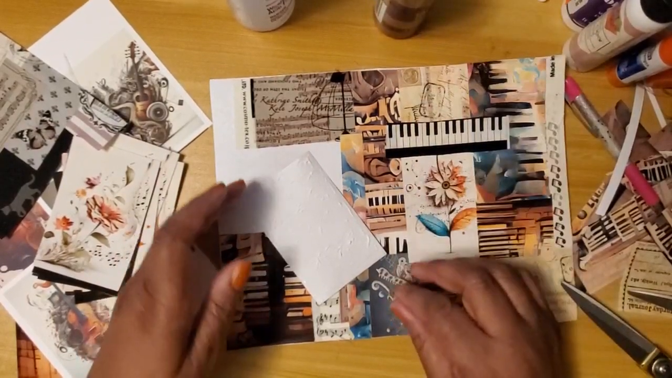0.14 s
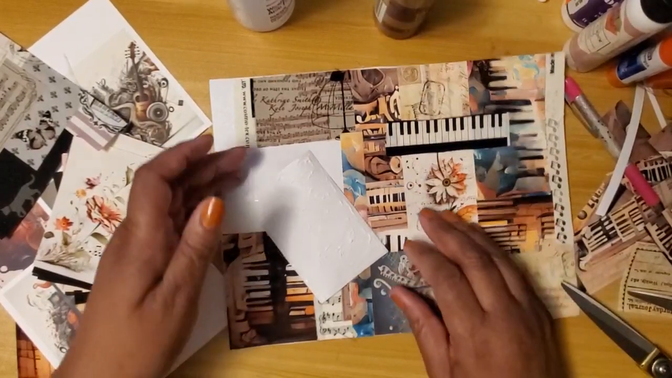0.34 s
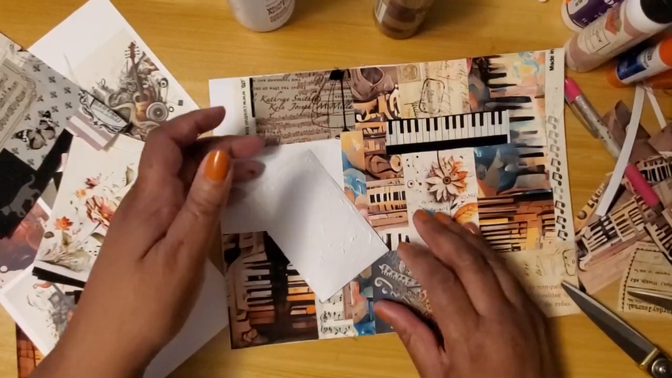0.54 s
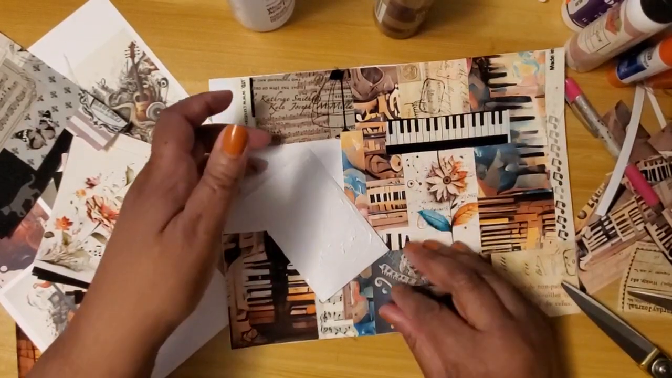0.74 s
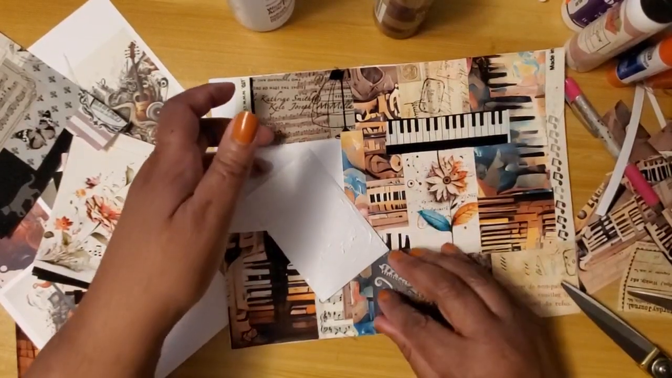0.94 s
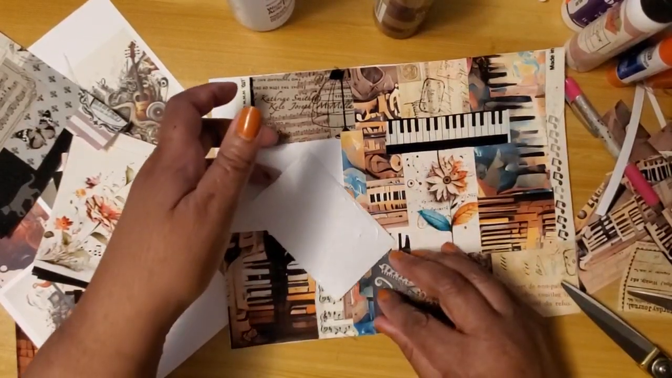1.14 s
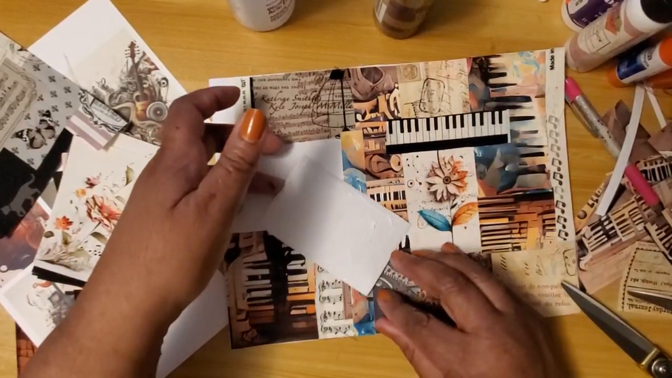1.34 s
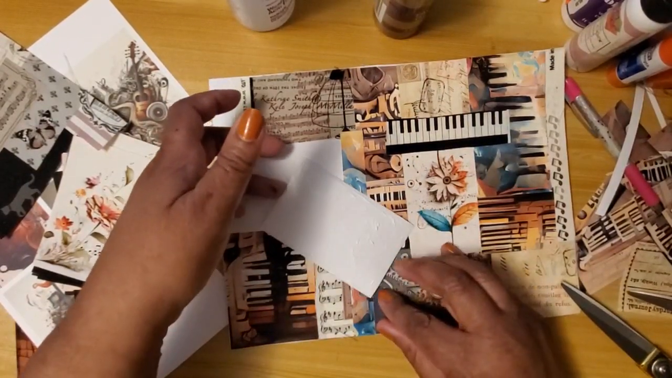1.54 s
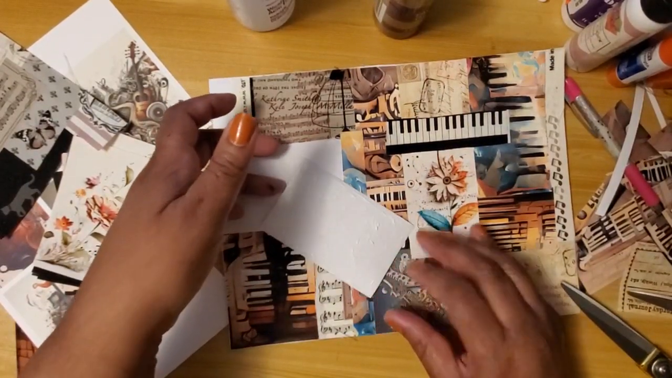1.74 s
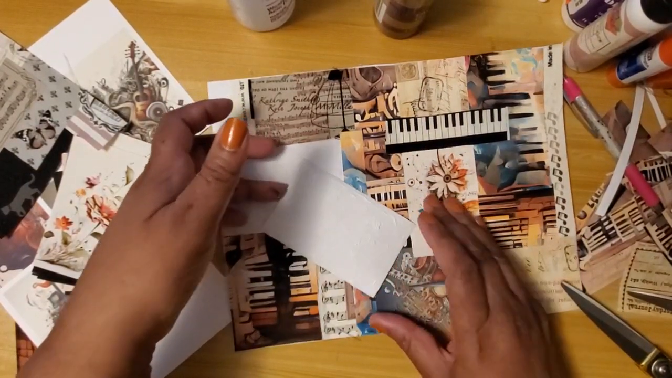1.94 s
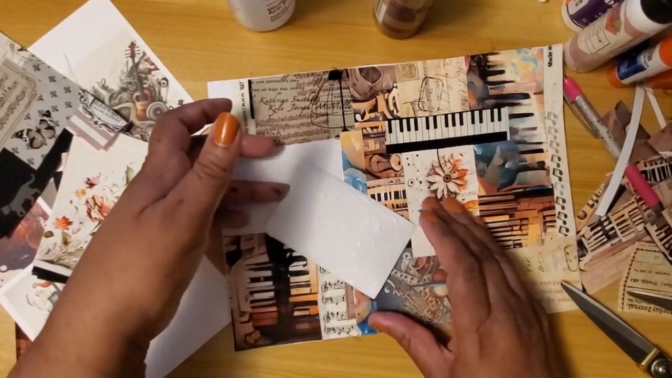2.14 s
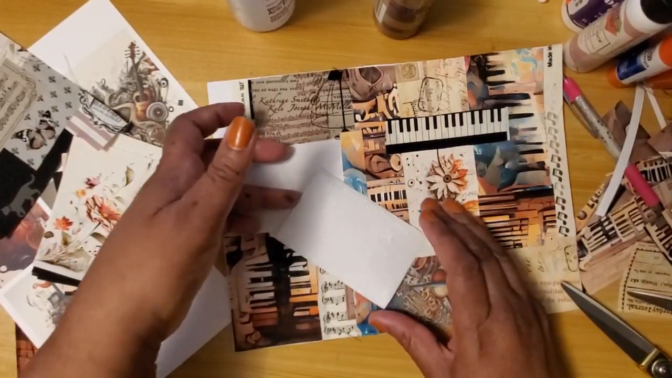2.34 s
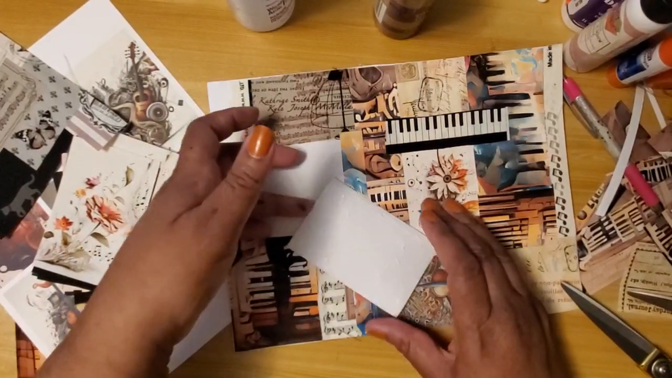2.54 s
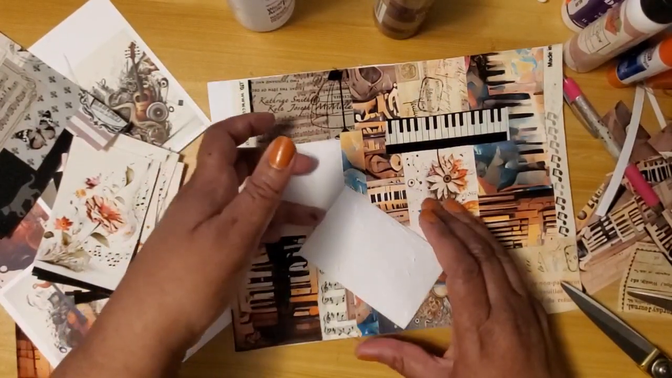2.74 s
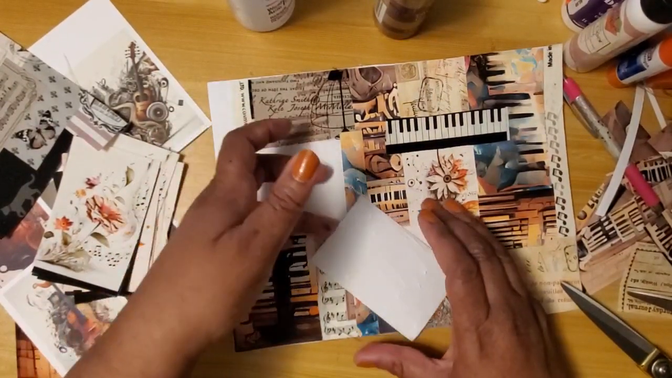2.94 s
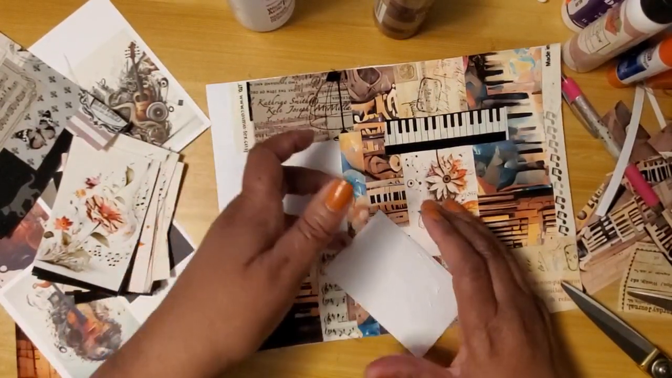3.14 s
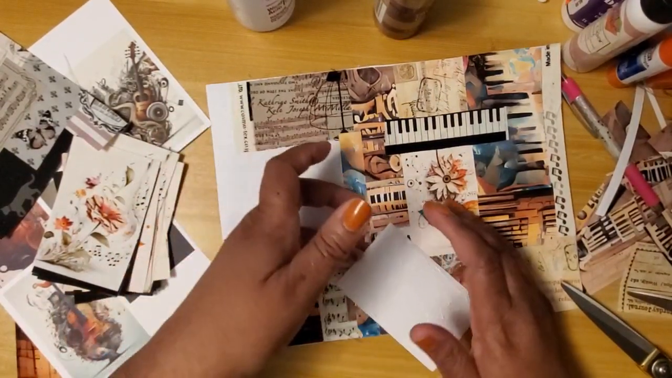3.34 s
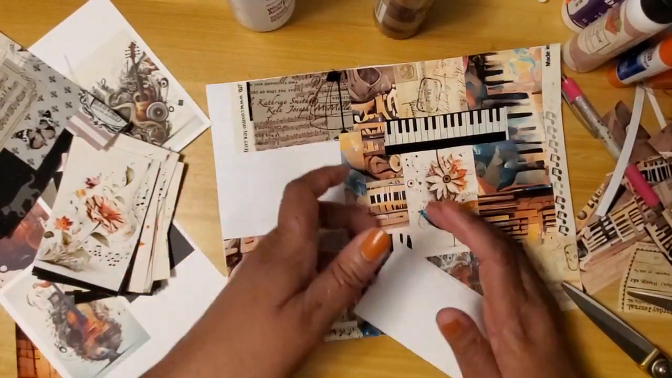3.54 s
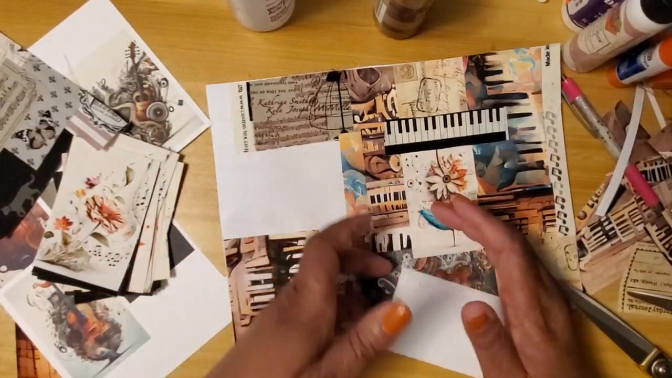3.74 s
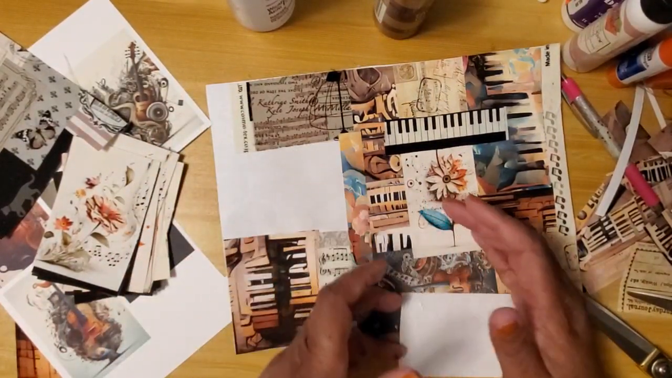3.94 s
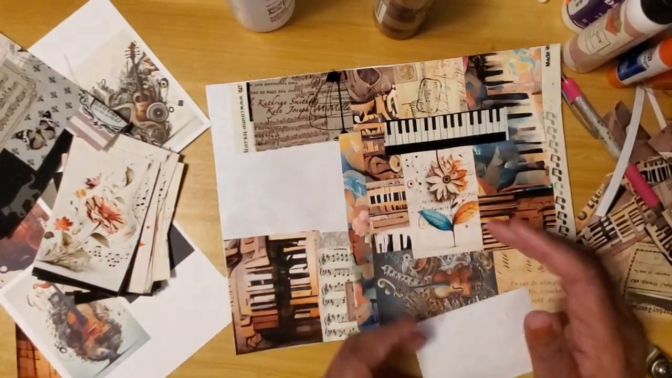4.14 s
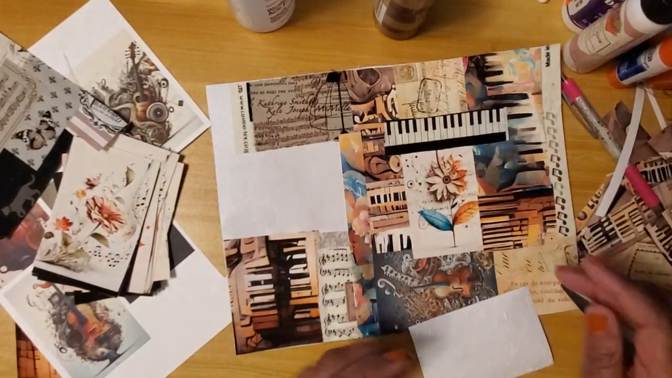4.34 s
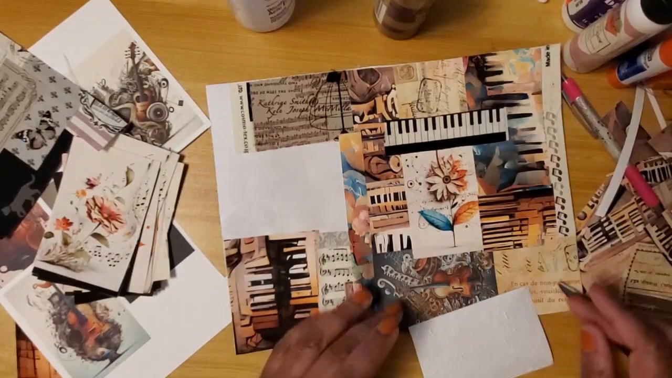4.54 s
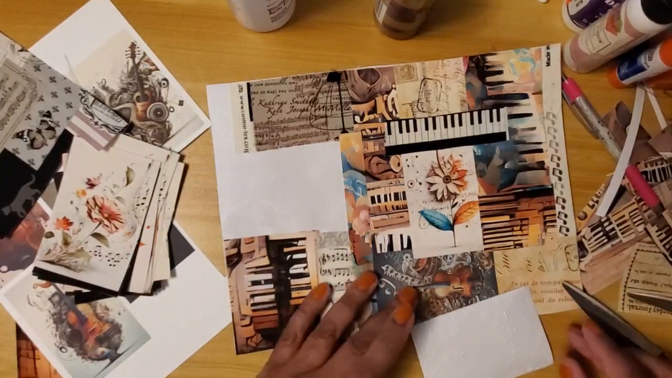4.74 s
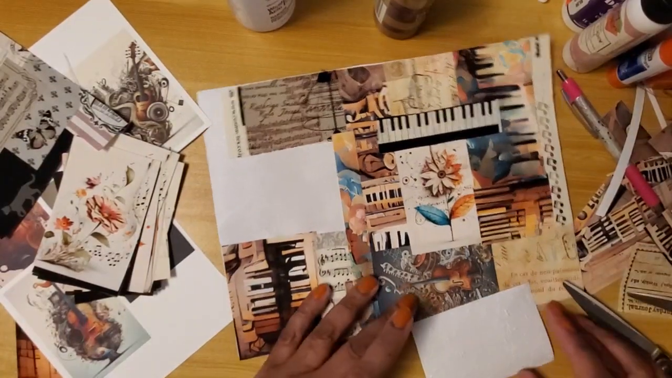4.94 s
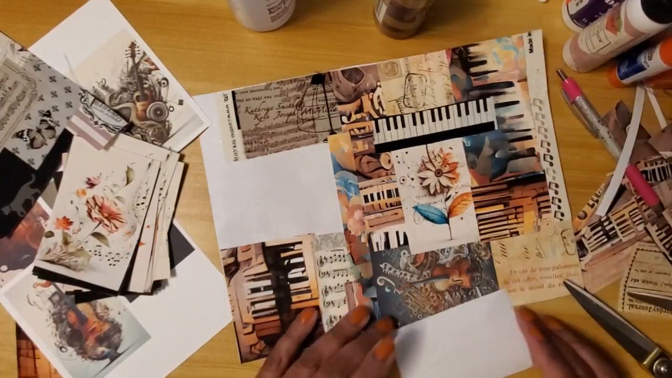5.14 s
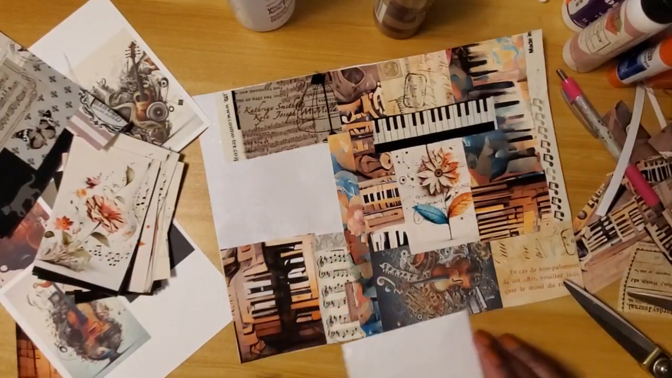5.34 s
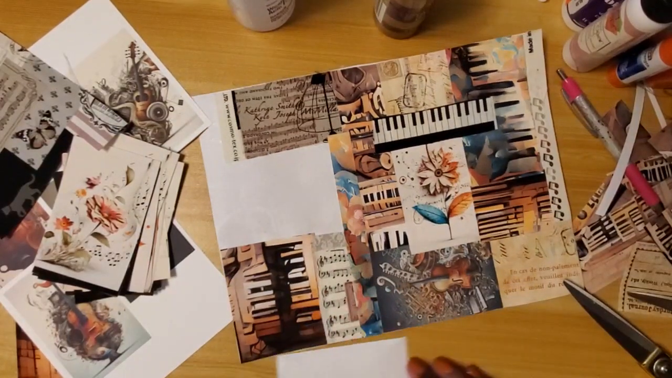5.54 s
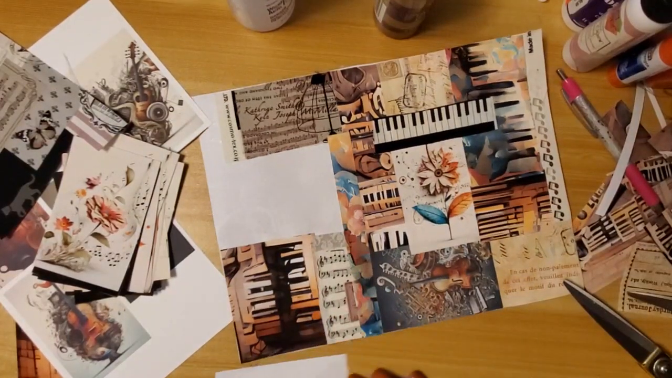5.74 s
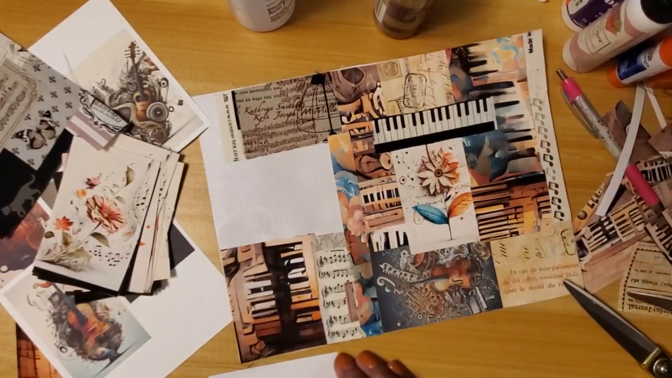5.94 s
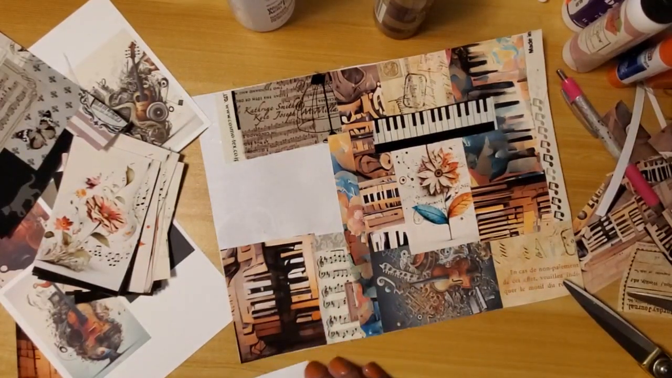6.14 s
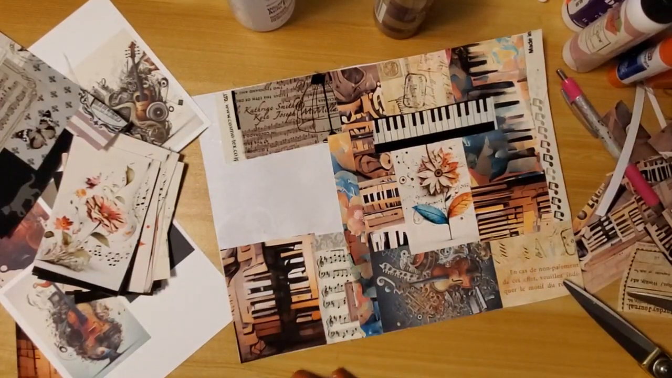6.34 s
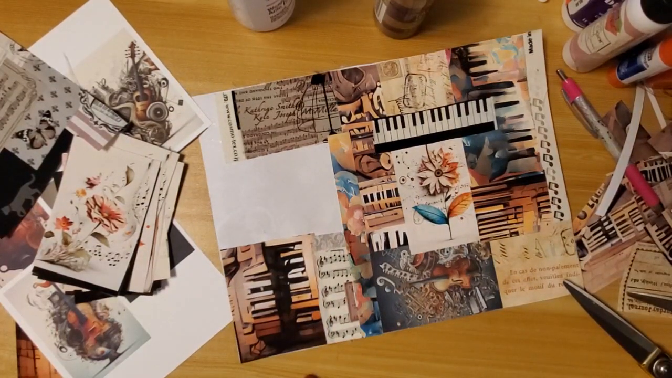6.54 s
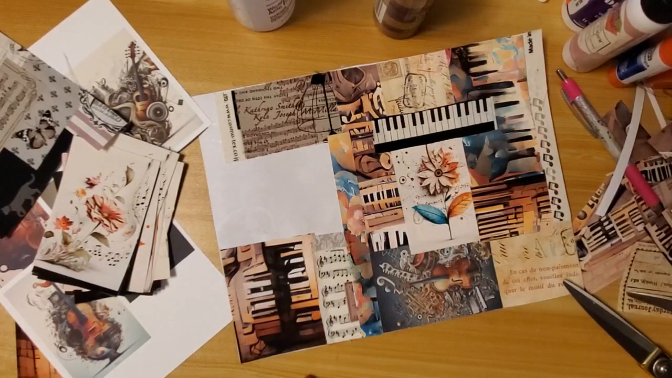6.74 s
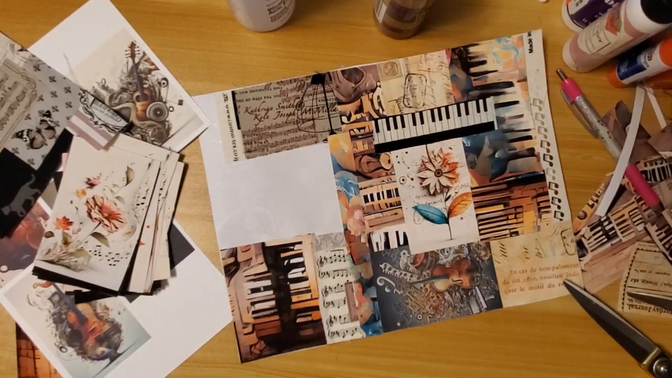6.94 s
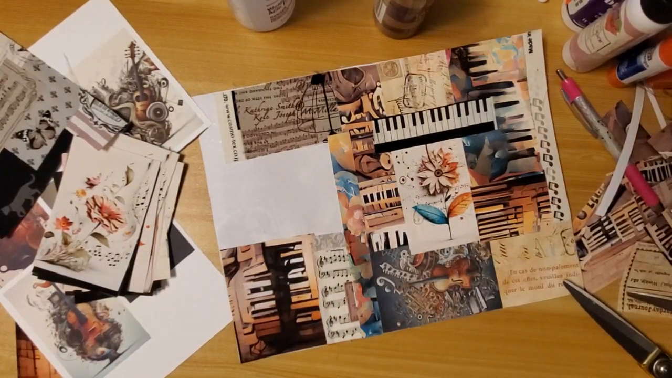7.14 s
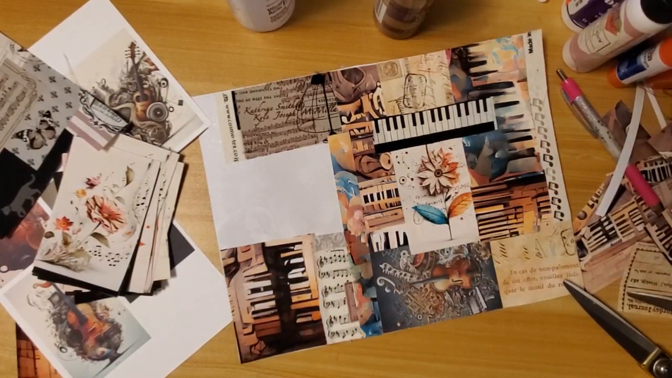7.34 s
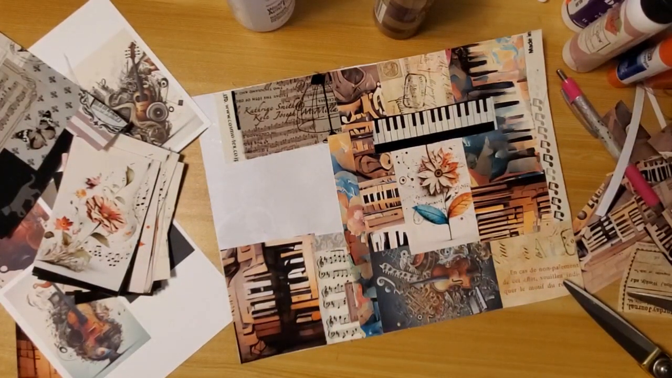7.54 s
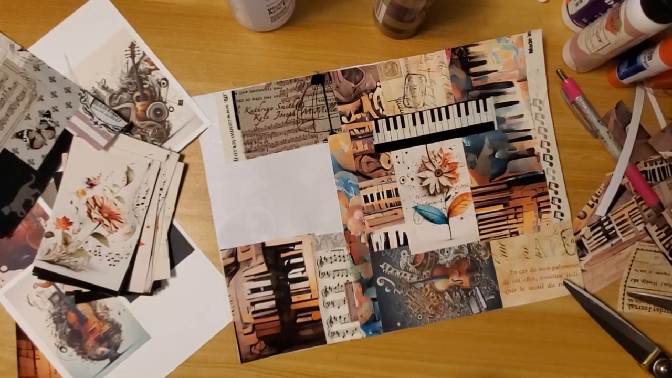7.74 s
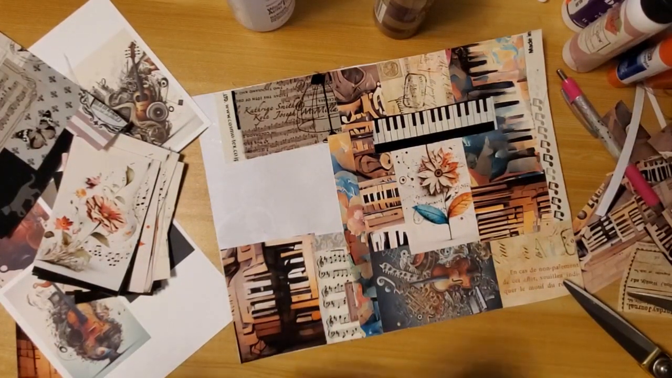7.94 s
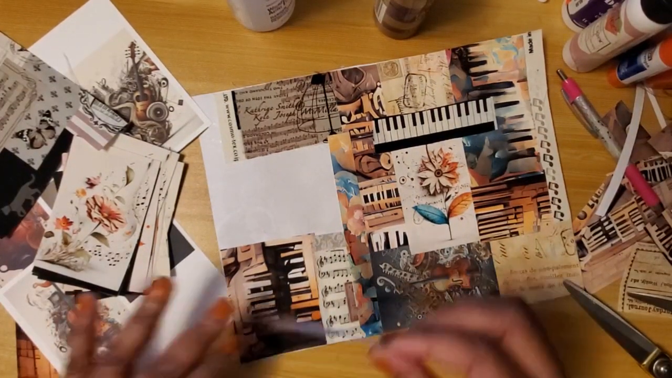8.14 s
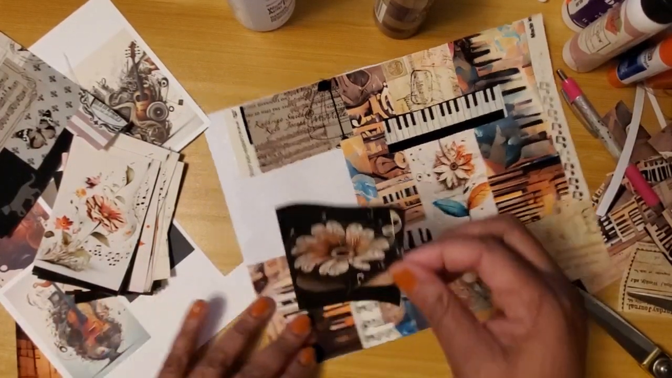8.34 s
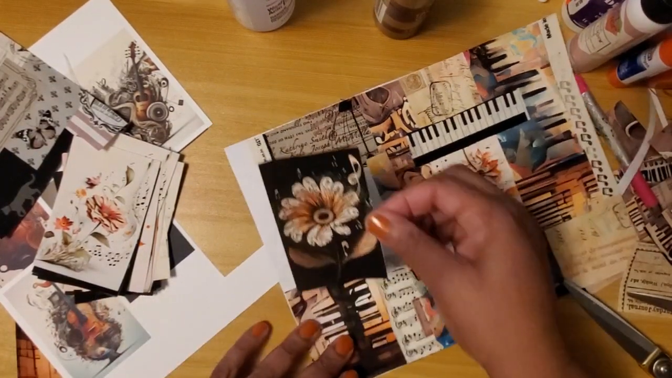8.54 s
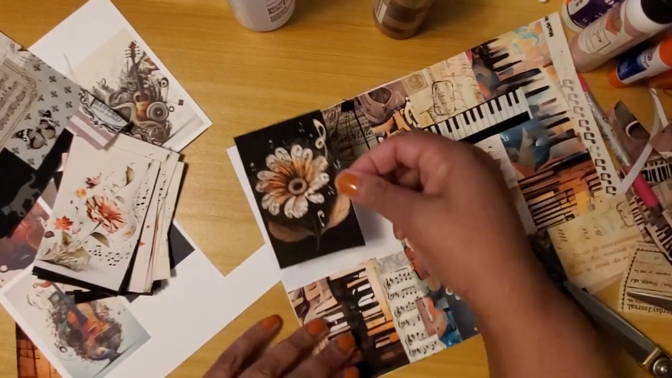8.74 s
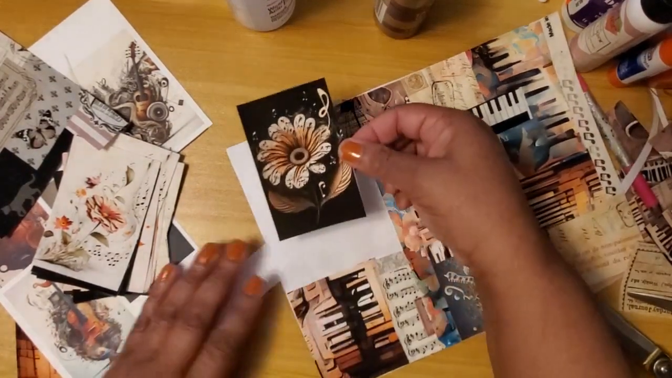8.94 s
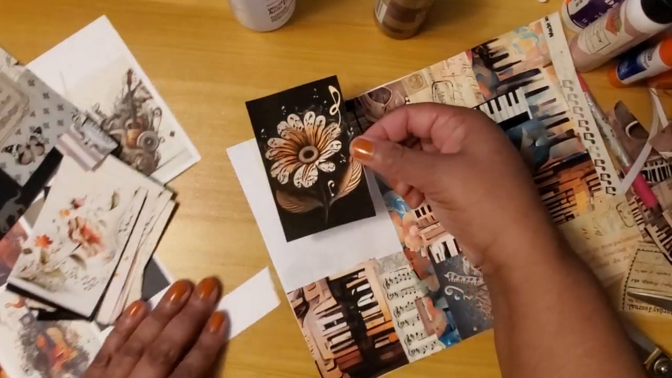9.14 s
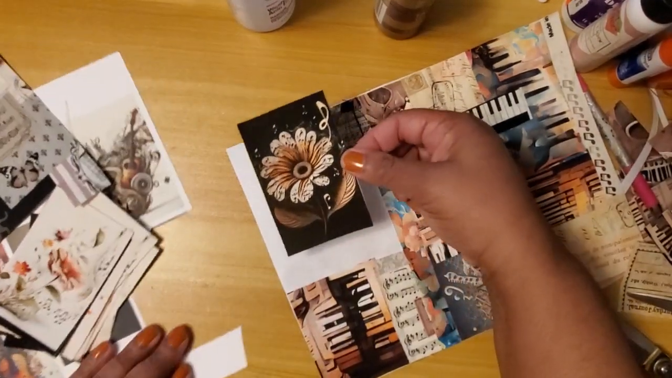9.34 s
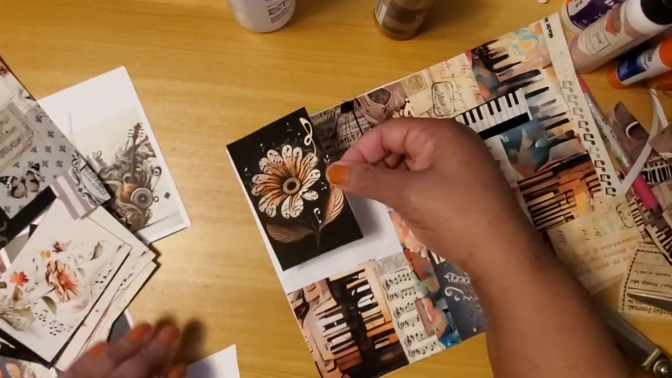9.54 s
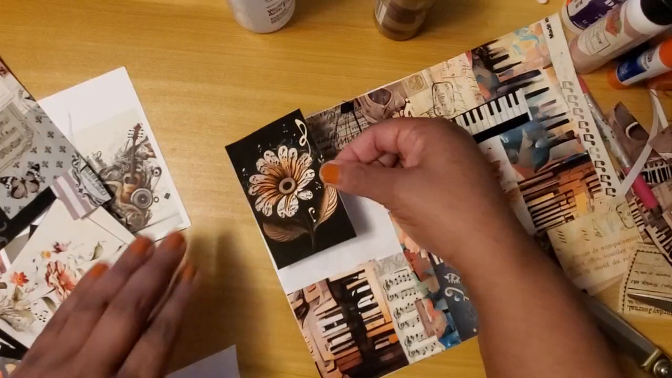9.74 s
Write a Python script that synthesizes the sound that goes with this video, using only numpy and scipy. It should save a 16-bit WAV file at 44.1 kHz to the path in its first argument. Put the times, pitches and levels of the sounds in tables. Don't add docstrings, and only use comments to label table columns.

```python
import sys
import numpy as np
from scipy import signal
from scipy.fft import rfft, irfft, next_fast_len
from scipy.io import wavfile
from scipy.ndimage import uniform_filter1d

SR = 44100
rng = np.random.default_rng(int(sys.argv[2]) if len(sys.argv) > 2 else 0)


def natural_amplitude(level_db):
    exponent = np.asarray(level_db, float) / 20
    return 10 ** exponent


def waveform_to_disk(signal):
    frames = np.transpose(np.atleast_2d(signal))
    scaled = np.clip(frames, -1, 1) * 32767
    samples = np.round(scaled).astype(np.int16)
    wavfile.write(sys.argv[1], SR, samples)


N = 431298
CLOCK = np.arange(0, N + 64, 64) / SR
OPPOSITE = np.array([[1], [-1]])
DROP_S = 4.7556
FADE_DB = 8


def colour(x, points, skirt=36):
    hz, db = np.transpose(points)
    n = x.shape[-1]
    size = next_fast_len(n, real=True)
    f = np.fft.rfftfreq(size, 1 / SR) + 1
    octaves_beyond = np.abs(np.log2(f / np.clip(f, hz[0], hz[-1])))
    gain_db = np.interp(np.log(f), np.log(hz), db) - skirt * octaves_beyond
    return irfft(rfft(x, size) * natural_amplitude(gain_db), size)[..., :n]


def unit(x):
    return x / np.sqrt(np.mean(np.atleast_2d(x).mean(axis=0) ** 2))


def walk(rate):
    k = int(SR / rate)
    steps = np.repeat(rng.standard_normal(N // k + 1), k)
    return unit(uniform_filter1d(uniform_filter1d(steps, k), k)[:N])


def pair(x, side):
    return x[0] + colour(x[1], side, 0) * OPPOSITE


def decay(t, t60):
    return np.exp(-np.log(1000) * t / t60)


def ring(hz, t60):
    t = np.arange(int(1.2 * t60 * SR)) / SR
    return np.sin(2 * np.pi * hz * t) * decay(t, t60)


def burst(t60, points):
    t = np.arange(int(t60 * SR) + 512)[:16384] / SR
    x = colour(rng.standard_normal(16384), points)[:len(t)] * decay(t, t60)
    return x / np.abs(x).max()


def press_in(x, rise_s):
    return x * np.minimum(np.arange(len(x)) / (rise_s * SR), 1)


def add(out, s, x, pan_db):
    i = int(s * SR)
    out[:, i:i + x.shape[-1]] += x[..., :N - i] * natural_amplitude(pan_db / 2 * OPPOSITE)


def fibres(spread_db, patchy_db):
    size_db = spread_db * np.minimum(rng.exponential(size=N), 6)
    pressure_db = patchy_db * walk(40) + patchy_db * walk(150)
    return rng.standard_normal((2, N)) * natural_amplitude(size_db + pressure_db)


def swell(s, half_s):
    return natural_amplitude(-FADE_DB * (np.abs(CLOCK - s) / half_s) ** 2.1)


def jerk(s, fade_s):
    attack_s = 0.0125
    after = np.maximum(CLOCK - s, 0)
    return np.minimum(after / attack_s, 1) * natural_amplitude(-FADE_DB * (after / fade_s) ** 1.65)


def motion(rows, shape):
    power = sum(np.outer(natural_amplitude(row[2:]) ** 2, shape(*row[:2]) ** 2) for row in rows)
    return np.array([np.interp(np.arange(N) / SR, CLOCK, track) for track in power])


# centre in s, half length in s, rasp in dB, fine grain
# relative to rasp in dB, air relative to rasp in dB.
STROKES = [(0.11, 0.084, -70.5, 2, -3), (0.33, 0.16, -81, 2.5, 4.5), (0.73, 0.072, -77, 9.5, 11.5),
           (0.925, 0.068, -71.5, 0.5, -3.5), (1.37, 0.083, -64.5, -4.5, -6), (1.66, 0.14, -87.5, 0, -4),
           (2.44, 0.09, -62, -6.5, -9), (2.59, 0.13, -65.5, -4.5, -0.5), (2.78, 0.17, -69, 0, 0),
           (3.0, 0.16, -68.5, 0.5, -1), (3.2, 0.11, -64.5, -1, -5), (3.32, 0.1, -65.5, -4, -5),
           (3.53, 0.072, -67.5, -1, -3), (3.66, 0.087, -59.5, -4, -4.5), (3.81, 0.055, -65.5, -1, -1),
           (3.93, 0.13, -71.5, -1, 0), (3.97, 0.036, -69, -1, -8), (4.022, 0.021, -69, 2.5, 3),
           (4.18, 0.086, -65, -6.5, -3.5), (4.3, 0.11, -76.5, -2, -5), (4.42, 0.57, -82.5, 3, 1),
           (5.236, 0.068, -57, -5.5, -1.5), (5.328, 0.075, -54.5, -4.5, -5), (5.468, 0.1, -53.5, -7.5, -7.5),
         (5.584, 0.027, -55.5, -1.5, -3.5), (5.676, 0.068, -53.5, -5, -5.5), (5.789, .07, -58.5, -4.5, -7),
         (5.916, 0.062, -80.5, 2.5, -0.5), (6.378, 0.065, -74.5, -0.5, -4), (6.499, 0.098, -72, -1.5, -5),
         (8.03, 0.078, -100, 4.5, 21), (8.19, 0.046, -100, 0, 16), (8.555, 0.06, -53.5, -1.5, 0.5),
         (8.456, 0.09, -64, 1, 6.5), (8.632, 0.052, -60.5, -8, -5), (8.78, 0.17, -77.5, -2.5, -1),
         (8.88, 0.015, -83.5, 17, 20), (5.143, .06, -68, 1, 5), (6.06, .08, -89.5, 3.5, 0),
         (9.258, 0.14, -69, 5.5, 11.5), (9.43, 0.11, -72.5, 4.5, 9)]
# start in s, fade in s, rasp in dB,
# fine grain relative to rasp in dB, air relative to rasp in dB.
JERKS = [(0.0, 0.057, -63, -4, -7), (0.395, 0.12, -64.5, 1, 1.5), (1.17, 0.12, -70, -3.5, -7),
         (1.975, 0.071, -66, -7, -4.5), (2.24, .12, -77, 0, -4), (4.998, 0.088, -57, -3, -5.5),
         (6.13, .18, -77, -2, -6), (7.37, 0.066, -83.5, -5, 3), (7.91, 0.058, -79.5, -8.5, 0),
         (8.17, 0.13, -81.5, -8, -3), (8.338, 0.22, -56, 1.5, 0), (8.9, 0.061, -64.5, -7, -9),
         (9.036, 0.14, -87, 13.5, 16), (9.09, 0.09, -85, 6, 8)]
# centre in s, half length in s, rumble in dB.
LEANS = [(0.0, 0.17, -59), (2.0, 0.044, -66.5), (2.5, 0.45, -74), (3.6, .12, -72), (4.3, 0.53, -69.5),
         (5.0, 0.095, -58), (5.25, 0.18, -65), (5.5, 0.13, -54), (5.68, 0.17, -60.5), (8.2, 0.061, -66),
         (8.4, 0.075, -61.5), (8.55, 0.056, -49.5), (8.65, 0.11, -67.5), (8.91, 0.046, -66.5),
         (9.25, 0.16, -65)]


def stroke_gains():
    def layers(rows):
        return [(s, length, db, db + fine_db, db + air_db) for s, length, db, fine_db, air_db in rows]
    strokes = motion(layers(STROKES), swell) + motion(layers(JERKS), jerk)
    idle_board_db = -91.5
    board = np.sqrt(motion(LEANS, swell)[0] + natural_amplitude(idle_board_db) ** 2)
    return (*np.sqrt(strokes), board)


# Hz, width in Hz, level in dB.
RASP = [(3050, 440, -3.5), (3360, 270, -6), (3810, 560, -3)]


def card_buckles(coarse):
    out = 0
    for hz, width, db in RASP:
        band = [(hz - 2.2 * width, -34), (hz - width, -10), (hz, 0), (hz + width, -8), (hz + 3 * width, -26)]
        out = out + natural_amplitude(db + 1.6 * walk(15)) * colour(coarse, band)
    return out


# Hz, dB per Hz.
FINE = [(3300, -22.5), (4200, -2.5), (5000, -0.5), (6300, -1.5), (7600, -6), (10000, -18)]


def fine_grain(grain):
    fine = colour(grain, FINE)
    upper = colour(fine, [(5000, -20), (5400, 0)], 0)
    return natural_amplitude(1.1 * walk(12)) * upper + natural_amplitude(1.3 * walk(14)) * (fine - upper)


# centre in s, half length in s, Hz, level in dB.
BUCKLES = [(0.688, .04, 6460, -79), (0.924, 0.037, 6100, -70), (1.243, 0.043, 3360, -74),
           (1.381, 0.054, 3300, -69.5), (2.39, 0.027, 3500, -75), (2.462, 0.045, 6440, -81),
           (2.491, .03, 3400, -64), (2.713, 0.042, 3400, -68), (2.72, 0.033, 6260, -82),
           (2.94, .04, 4080, -77), (3.038, 0.033, 3600, -67.5), (3.05, 0.034, 5340, -75),
           (3.16, 0.028, 3500, -67), (3.28, .04, 4300, -70), (3.31, 0.046, 5600, -72),
           (3.307, 0.026, 3150, -68), (3.477, 0.049, 4130, -74), (3.538, .03, 7500, -74),
           (3.566, 0.044, 4420, -66.5), (3.64, 0.038, 4700, -65.5), (3.67, 0.058, 7400, -66.5),
           (3.702, 0.042, 3080, -68), (3.78, .03, 3620, -74), (3.808, 0.033, 5170, -72),
           (3.853, 0.028, 3450, -73), (4.02, .015, 6500, -72), (4.127, 0.051, 6600, -73.5),
           (4.135, 0.042, 3600, -69), (5.14, .05, 5170, -70.5), (5.331, 0.029, 3400, -58.5),
           (5.503, 0.041, 5040, -59.5), (5.583, .025, 3530, -59), (5.657, 0.031, 3350, -60),
           (5.695, 0.019, 5200, -55.5), (6.32, 0.021, 3560, -82.5), (6.37, 0.028, 3580, -76),
           (7.982, .05, 13600, -83), (8.06, 0.056, 14560, -80), (5.245, 0.027, 3150, -63),
           (8.391, 0.035, 3250, -58.5), (8.416, .02, 2900, -58.5), (8.53, 0.029, 2860, -56),
           (8.64, 0.055, 14900, -67), (9.17, 0.046, 6290, -76), (9.443, 0.031, 6460, -66.5),
           (9.466, 0.033, 5470, -69.5)]
# Hz, side minus mid in dB.
SLIDE_SIDE = [(60, -3), (110, -11), (200, -13.5), (500, -6), (1290, -0.5), (2380, -3), (4400, -1),
              (15000, 1)]


def buckling():
    out = np.zeros((2, N))
    width = 0.071
    for s, half_s, hz, db in BUCKLES:
        t = np.arange(-2.5 * half_s, 2.5 * half_s, 1 / SR)[:16384]
        grain = rng.standard_normal((2, 16384)) * natural_amplitude(2.5 * np.minimum(rng.exponential(size=16384), 6))
        band = [(hz * (1 - 2 * width), -20), (hz, 0), (hz * (1 + 2 * width), -17)]
        sung = unit(colour(pair(grain, SLIDE_SIDE), band))[:, :len(t)]
        add(out, s + t[0], natural_amplitude(db + 2.0 - FADE_DB * (t / half_s) ** 2) * sung, 0)
    return out


# Hz, dB per Hz.
AIRY = [(5500, -23.5), (7000, -6), (9000, -3.5), (11000, -4.5), (12500, -2.5), (14000, -2.5), (15800, 1)]
# Hz, dB per Hz.
BOARD = [(200, -27), (400, 1), (650, -2), (1000, -6.5), (1500, -5.5), (2300, -11), (3200, -30.5)]
# Hz, dB per Hz.
BIG_SHEET = [(900, -27), (1400, -2), (2000, -4), (2500, -1), (2900, -3.5), (3500, -41)]
# Hz, dB per Hz.
BELLY = [(1900, -23.5), (2300, -2.5), (2600, -18)]
# time in s, left minus right in dB.
HANDS = [(0, 1), (2.5, 0), (4.3, 1), (5.1, -0.5), (5.8, 2), (6.5, 8), (8.4, 0.5), (8.9, 0.5), (9.2, 3.5),
         (9.78, 6)]


def slide():
    t = np.arange(N) / SR
    rasp_gain, fine_gain, airy_gain, board_gain = stroke_gains()
    coarse = pair(fibres(spread_db=3.0, patchy_db=1.15), SLIDE_SIDE)
    fine = fine_grain(pair(fibres(spread_db=3.0, patchy_db=0.9), SLIDE_SIDE))
    airy = colour(pair(fibres(spread_db=1.5, patchy_db=1.0), SLIDE_SIDE), AIRY)
    board = colour(pair(fibres(spread_db=3.0, patchy_db=1.0), SLIDE_SIDE), BOARD)
    sound = rasp_gain * natural_amplitude(-1.5) * unit(card_buckles(coarse))
    sound = sound + fine_gain * natural_amplitude(1.43) * unit(fine)
    sound = sound + airy_gain * natural_amplitude(-1.0) * unit(airy)
    sound = sound + board_gain * natural_amplitude(-6.5) * unit(board)
    flex_gain = np.sqrt(rasp_gain * board_gain)
    big_sheet_s = 8.338
    sound = sound + (t > big_sheet_s) * flex_gain * natural_amplitude(-6.0) * unit(colour(coarse, BIG_SHEET))
    sound = sound + (t > DROP_S) * flex_gain * natural_amplitude(-15.5) * unit(colour(coarse, BELLY))
    sound = sound + buckling()
    pan_db = np.interp(t, *np.transpose(HANDS))
    return sound * natural_amplitude(np.array([pan_db, -pan_db]) / 2)


# start in s, peak in dB, ring in Hz, top relative
# in dB, left minus right in dB.
TICKS = [(0.3975, -53, 4920, -5, 2), (1.9829, -50, 3400, -10, 7), (2.004, -41.5, 4600, -22, -3),
         (2.0116, -45.5, 4080, -22, 15), (4.0085, -42, 3600, -7, 2), (5.597, -38, 4500, -12, 0),
         (8.3449, -44, 6364, -10, 17), (8.3689, -54, 5740, -14, -2), (8.5627, -26.5, 2550, -19, -3),
         (8.704, -53.5, 3700, 2, 3.5), (8.905, -49, 2600, -24, 18),
         (.6135, -62, 6590, -10, 5), (1.9794, -50, 6800, -13.5, 0.5), (3.0355, -57, 3550, -14, 0),
           (3.6127, -47, 4870, -16, 0), (5.5521, -45, 3300, -14, -1), (5.568, -47, 3530, -14, 0),
           (5.6858, -39, 5270, -12, 2), (6.1432, -61, 3400, -9, 3.5), (6.3069, -64, 3560, -8, 6),
           (6.3465, -58.5, 3580, -4.5, 5), (7.912, -67, 2997, -10, 0), (8.2038, -65.5, 2460, -12, 3),
           (8.505, -41, 2890, -18, 0), (8.8711, -60, 6400, -6, 0), (9.0265, -57.5, 3850, -10, 12),
           (9.042, -68.5, 6500, -5, 5), (9.0971, -56, 6700, -4, 3.5), (9.4323, -49, 6290, -10, -4.5)]


def ticks():
    out = np.zeros((2, N))
    for s, db, hz, top_db, pan_db in TICKS:
        snap = [(hz / 2, -30), (hz * 0.88, -5), (hz, 0), (hz * 1.15, -5), (9000, -20)]
        add(out, s, natural_amplitude(db) * burst(0.008, snap), pan_db)
        add(out, s, natural_amplitude(db + top_db) * burst(0.009, AIRY), pan_db)
    return out


# start in s, peak in dB, ring in Hz, t60 in s, left minus right in dB.
TAPS = [(1.07, -67.5, 1350, 0.22, 4), (2.48, -62, 574, 0.33, 2), (3.58, -68, 770, 0.15, 7),
        (4.625, -48, 250, 0.12, 0), (4.732, -50, 958, 0.11, -12.5), (6.1115, -44, 416, 0.058, -6),
        (6.124, -44.5, 504, 0.12, -0.5), (6.119, -67, 2150, 0.13, -1), (6.12, -59, 1195, 0.17, 2),
        (6.118, -63, 2730, 0.095, 1.5), (6.15, -54, 250, 0.11, -0.5)]
THUMPS = [(8.165, -50.5, 404, 0.42, 0.5), (8.36, -53, 304, 0.26, 1), (8.167, -63.5, 1190, 0.33, 5),
          (8.185, -55.5, 283, 0.28, -1), (8.17, -57, 505, .33, 2), (8.2, -67, 2050, 0.2, 0),
          (8.504, -47.5, 824, 0.16, -2), (8.55, -45, 1100, 0.16, -1)]
NAILS = [(0.0, -65.5, 1393, 0.72, 4.5), (0.72, -82, 950, 1, -3), (3.52, -58.5, 1252, 0.16, 1),
         (3.525, -69, 1590, .12, 1), (7.39, -66, 1160, 0.13, 0.5), (7.878, -77, 849, .08, -3.5)]
FLICKS = [(8.905, -56, 1158, 0.11, -12), (8.905, -57.5, 850, 0.16, 3), (8.905, -57, 2630, 0.1, 0),
          (8.905, -52, 1900, 0.07, -11), (8.905, -59, 3250, .06, 0), (8.905, -57, 1610, .08, 0),
          (8.917, -58, 1840, .13, 0), (8.92, -57, 2450, 0.18, 0), (8.915, -60, 3410, .13, 0)]


def taps():
    out = np.zeros((2, N))
    knock_db = -12
    kinds = [(TAPS, -4.5, -11.5), (THUMPS, 3.5, -9), (NAILS, -22, -11.5), (FLICKS, -22, -6.5)]  # thud, ring dB
    for rows, thud_db, ring_db in kinds:
        for s, db, hz, t60, pan_db in rows:
            band = [(hz * .3, -32), (hz * .7, -13), (hz * .92, -4), (hz, 0),
                    (hz * 1.08, -4), (hz * 1.4, -12), (hz * 2.6, -27), (hz * 5, -50)]
            add(out, s, natural_amplitude(db + ring_db + 12 * min(t60, .75)) * ring(hz, t60), pan_db)
            knock = natural_amplitude(knock_db - ring_db) * burst(t60, band)
            thud = natural_amplitude(thud_db) * burst(t60, [(50, -22.5), (120, 3.5), (250, -3.0), (500, -34.5)])
            add(out, s, natural_amplitude(db) * press_in(knock + thud, rise_s=0.0051), pan_db)
    return out


# start in s, peak in dB, brightness in dB.
BLOWS = [(4.7556, -16.5, -1), (4.7565, -10.5, 2.5), (4.7600, -13, -2.5), (4.7664, -12, -10),
         (4.772, -15.5, -3), (4.7747, -13, -5), (4.7786, -15, -7), (4.786, -17, -6.5), (4.791, -14.5, -10),
         (4.797, -19.5, -7), (4.804, -15.5, -8), (4.809, -18, -8.5), (4.814, -20, -6.5), (4.821, -22, -8),
         (4.833, -26.5, -6.5)]
# Hz, level in dB, t60 in s.
TOOL = [(173.4, -36, .16), (335, -29.5, 0.071), (357, -30, .14), (556, -33, .13), (646, -29, .12),
        (981, -29.5, .13), (1170, -39, .13), (1560, -43.5, .09), (1876, -39.5, .1), (2250, -37, .12),
        (2460, -41, .1), (2710, -40, .12), (3384, -42, .11), (3736, -36, .1)]


def blows():
    out = np.zeros((2, N))
    crack_band = [(1200, -29.5), (2800, -10.5), (3800, 9.5), (4600, -1),
                  (6300, -8.5), (9000, -25.5), (14000, -16.0)]
    knock_band = [(60, -9.0), (330, 0.5), (1000, 1), (2500, -16.0), (5000, -25.5)]
    for s, db, bright_db in BLOWS:
        shared, apart = burst(0.0094, crack_band), burst(0.0094, crack_band)
        add(out, s, natural_amplitude(db + bright_db) * (shared + .6 * apart * OPPOSITE), 1.5)
        add(out, s, natural_amplitude(db - 11.5) * burst(0.018, knock_band), .8)
        for hz, mode_db, t60 in TOOL:
            size, detune, pan = rng.standard_normal(3)
            mode = ring(hz * (1 + 0.0017 * detune), .6 * t60)
            add(out, s, natural_amplitude(db + 3.5 + mode_db + 3.0 * size) * mode, hz / 400 * pan)
    return out


# Hz, level in dB, t60 in s.
LONG_RINGS = [(1351, -60, 1.7), (1545, -62, .6), (1884, -64, 2.2), (2143, -63, 1.4), (560, -61, 1.0),
              (2643, -59, .4), (3230, -60, 1.2), (3311, -57, .55)]


def long_rings():
    out = np.zeros((2, N))
    stilled = int(.44 * SR)
    for hz, db, t60 in LONG_RINGS:
        neighbours = ((0, 1), (11, .55), (-17, .3))
        beating = sum(ring(hz + split, t60)[:stilled] * share for split, share in neighbours)
        held = beating * signal.windows.tukey(stilled, .2)
        add(out, DROP_S, natural_amplitude(db - 1.5) * held, 3 * rng.standard_normal())
    add(out, DROP_S, natural_amplitude(-33) * press_in(ring(54, .35), rise_s=.03), -14)
    return out


# time in s, body in dB, treble relative in dB.
RATTLE = [
    (4.757, -21.5, -11),
    (4.764, -21, -15.5),
    (4.814, -25.5, -18),
    (4.845, -39, -21.5),
    (4.888, -55.5, -27.5),
    (4.99, -58, -30.5),
]
# Hz, dB per Hz.
RATTLE_BODY = [(50, -12.5), (250, -1.5), (400, -0.5), (461, -6.5), (650, -7), (795, -8), (973, -6),
               (1460, -10), (2000, -9), (3770, -10.5), (5000, -31.5), (6500, -52.5)]
# Hz, dB per Hz.
RATTLE_TOP = [(2940, -32.5), (5000, -4), (6570, -6.5), (8800, -13), (9680, -15), (15200, -10.5),
              (15700, -8)]
# Hz, side minus mid in dB.
RATTLE_SIDE = [(110, -0.5), (200, -15), (380, -4.5), (700, -2), (1500, 2), (4400, -0.5), (8120, 3.5),
               (15000, 1)]
# Hz, level in dB.
BOARD_MODES = [(109, -35), (238, -37.5), (398, -32), (851, -44), (3290, -44)]


def rattle():
    out = np.zeros((2, N))
    s, *columns = np.transpose(RATTLE)
    body_db, top_db = (np.interp(np.arange(N) / SR, s, c, left=-np.inf, right=-np.inf) for c in columns)
    body = unit(colour(pair(fibres(spread_db=0.5, patchy_db=-1.5), RATTLE_SIDE), RATTLE_BODY))
    top = unit(colour(pair(fibres(spread_db=3.0, patchy_db=3.0), RATTLE_SIDE), RATTLE_TOP))
    t = np.arange(int(s[0] * SR), int(s[-1] * SR)) / SR
    sung = 0
    for k, (hz, db, *_) in enumerate(TOOL + BOARD_MODES):
        lean_db = OPPOSITE * (-1) ** k * min(hz / 600, 3.0)
        sung = sung + natural_amplitude(db + lean_db) * np.sin(2 * np.pi * hz * t)
    sung_db = np.interp(t, s, columns[0]) + 21 - 40 * (t - s[0])
    add(out, s[0], natural_amplitude(sung_db) * sung, 0)
    return out + natural_amplitude(body_db - 3.5) * (body + natural_amplitude(top_db) * top * natural_amplitude(-1.2 * OPPOSITE))


def tool():
    return blows() + long_rings() + rattle()


def room(x):
    t = np.arange(int(.5 * SR)) / SR

    def tail_noise(t60):
        return pair(rng.standard_normal((2, len(t))), RATTLE_SIDE) * decay(t, t60) * (t > .003)
    low = colour(tail_noise(0.12), [(100, 0.5), (1000, 0.5), (3500, 2.5), (5000, -30.5)])
    high = colour(tail_noise(1.7 * 0.12), [(2500, -30.0), (4500, -6.0), (9000, -8.5), (16000, -10)])
    tail = low + high
    tail = tail / np.sqrt(np.sum(tail[0] ** 2))
    return signal.fftconvolve(x.mean(axis=0, keepdims=True), tail, axes=1)[:, :N]


# centre in s, half length in s, level in dB.
JOGS = [(0.0, 0.4, -54.5), (0.9, .6, -69), (2.08, 0.064, -55.5), (3.21, 0.22, -63), (4.25, 0.12, -58),
        (4.9, 0.18, -52.5), (5.4, 0.59, -57), (6.6, 0.36, -70), (8.45, 0.17, -53), (9.1, 0.075, -56.5),
        (9.55, .2, -63)]


def stand_shake():
    band = [(20, -27), (42, -22.5), (54, -4.5), (75, -14.5), (200, -61.5)]
    noise = unit(colour(rng.standard_normal(N), band))
    return np.sqrt(motion(JOGS, swell)[0]) * natural_amplitude(-1.0) * noise * np.array([[.55], [1.45]])


# time in s, level in dB.
DRONE = [(0.0, -53), (0.41, -64), (1.85, -58.5), (3.06, -57), (3.21, -55.5), (4.01, -58), (4.25, -53.5),
         (4.59, -58.5), (4.85, -57), (4.99, -57), (6.6, -64.5), (6.79, -81), (6.97, -60), (7.44, -79.5),
         (7.93, -73), (8.5, -55), (8.85, -62.5), (9.301, -57)]


def house_drone():
    hz, width_hz = 108, 11
    band = [(55, -26), (hz - width_hz, -9), (hz, 0), (hz + width_hz, -7),
            (160, -15), (250, -18), (320, -31), (560, -39)]
    level_db = np.interp(np.arange(N) / SR, *np.transpose(DRONE))
    hum = natural_amplitude(level_db + 1.2) * unit(colour(rng.standard_normal(N), band))
    motor = np.sin(2 * np.pi * np.cumsum(hz + 5.0 * walk(2.5)) / SR)
    return hum + natural_amplitude(level_db - 1.5 + 2.5 * walk(6)) * motor


# Hz, dB per Hz.
QUIET = [(15, -50.5), (25, -28.5), (43, -3.5), (140, -0.5), (180, -11.5), (240, -6.5), (290, -18),
         (500, -26), (1150, -35), (1900, -39), (5200, -48), (7500, -55), (15700, -46)]
# Hz, side minus mid in dB.
QUIET_SIDE = [(60, -4), (110, -10.5), (200, -11.5), (380, -4.5), (700, -4), (1290, -1), (4400, 0.5),
              (15000, 0)]
# Hz, dB per Hz.
WHINE = [(5700, -20.5), (6200, -5), (6600, -0.5), (7000, -7), (7400, -24.5)]


def quiet():
    floor = unit(colour(pair(rng.standard_normal((2, N)), QUIET_SIDE), QUIET)) * natural_amplitude(-58.5 + 0.21 * walk(11.0))
    whine = natural_amplitude(-82.5) * unit(colour(rng.standard_normal(N), WHINE)) * natural_amplitude(np.array([[5.0], [-14.0]]))
    duck_db, duck_s = -8.5, 0.18
    after = np.arange(N) / SR - DROP_S
    duck = natural_amplitude(duck_db * (after > 0) * np.exp(-np.abs(after / duck_s) ** 2))
    left, right = duck * (floor + whine) + house_drone() + stand_shake()
    port_lag_samples = 7
    return np.array([left, np.roll(right, port_lag_samples)])


def scene():
    hits = colour(ticks() + taps() + tool(), [(22, -24), (42, 0)], 0)
    room_db = -9
    return hits + natural_amplitude(room_db) * room(hits) + slide() + quiet()


def top_cut(x):
    return signal.sosfilt(signal.butter(12, 16550, fs=SR, output="sos"), x)


def record(dry):
    mix = colour(dry, [(15700, -1.5), (15850, -46.5), (16600, -49.5), (16800, -90)], 0)
    return top_cut(mix)


dry = scene()
out = record(dry)
waveform_to_disk(out)
```